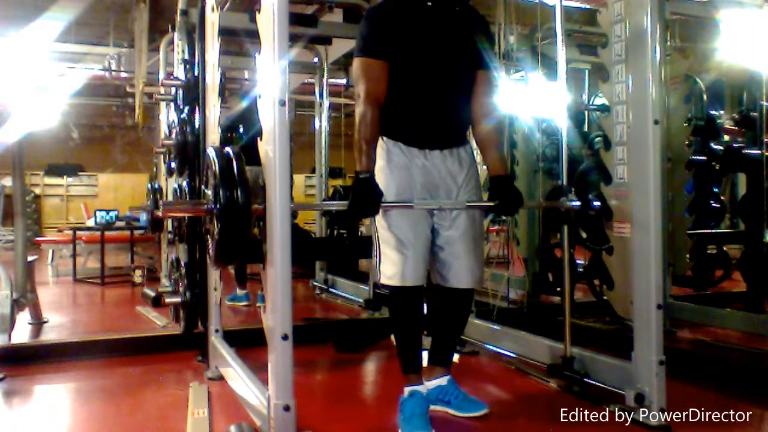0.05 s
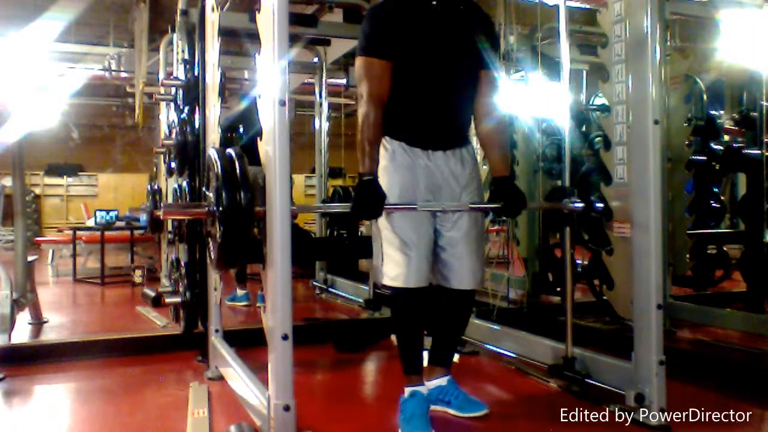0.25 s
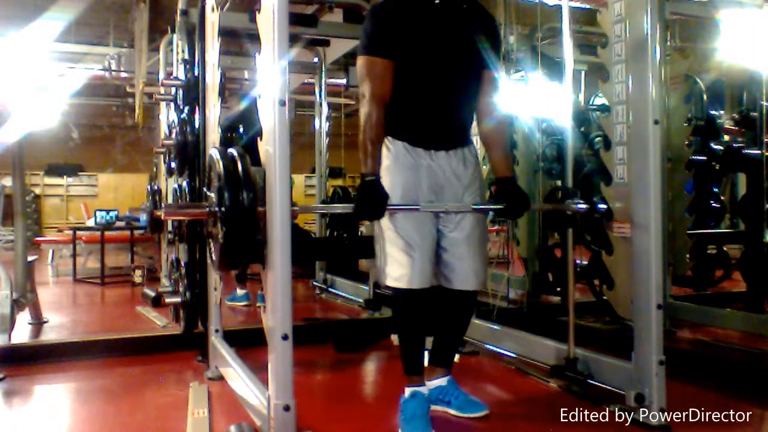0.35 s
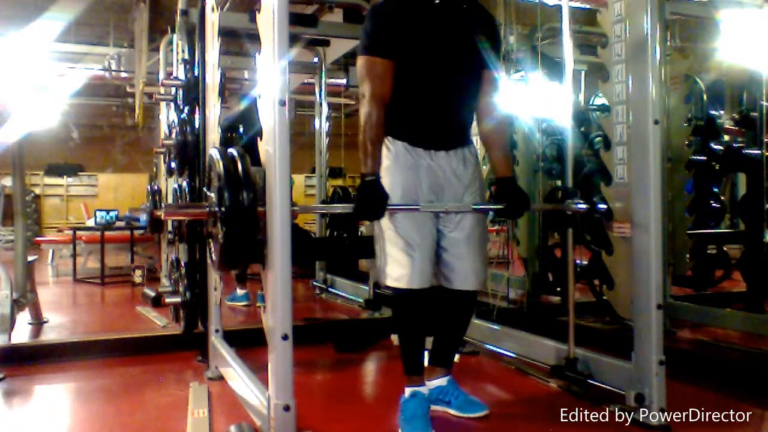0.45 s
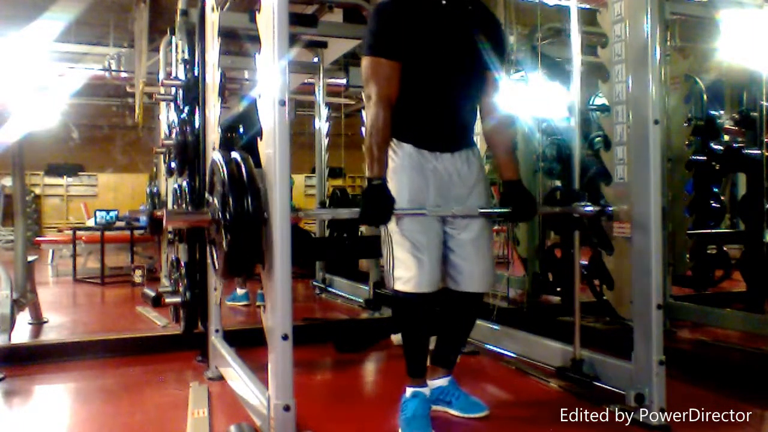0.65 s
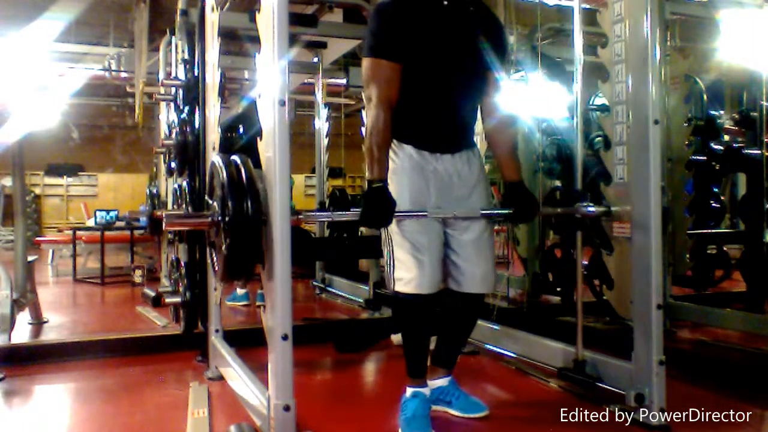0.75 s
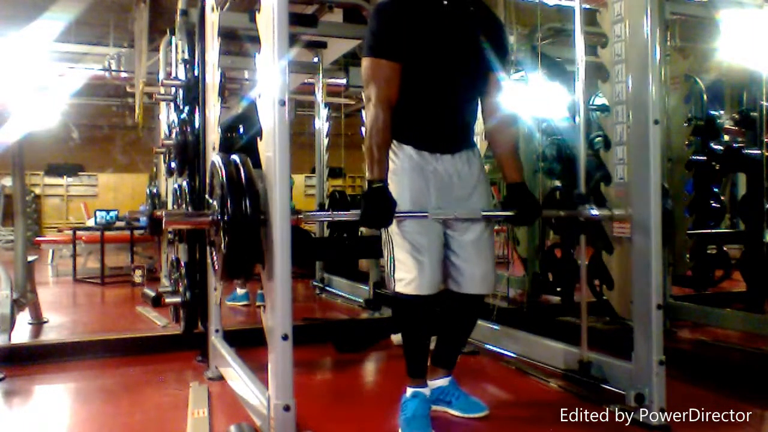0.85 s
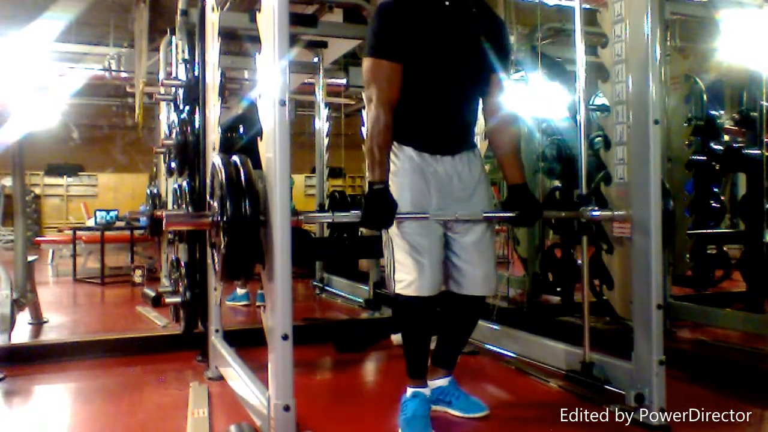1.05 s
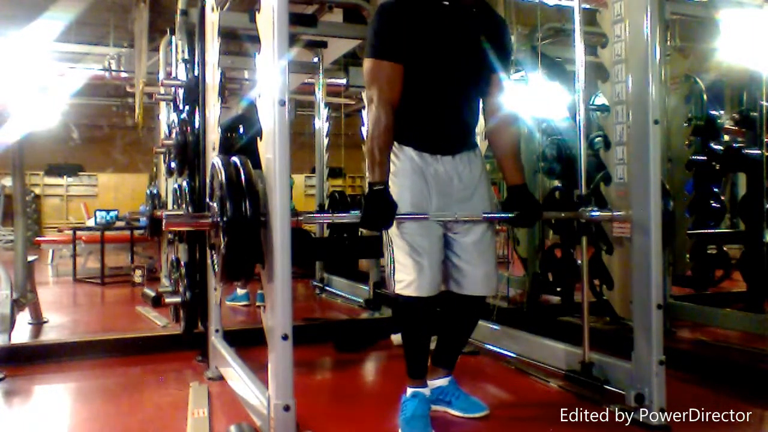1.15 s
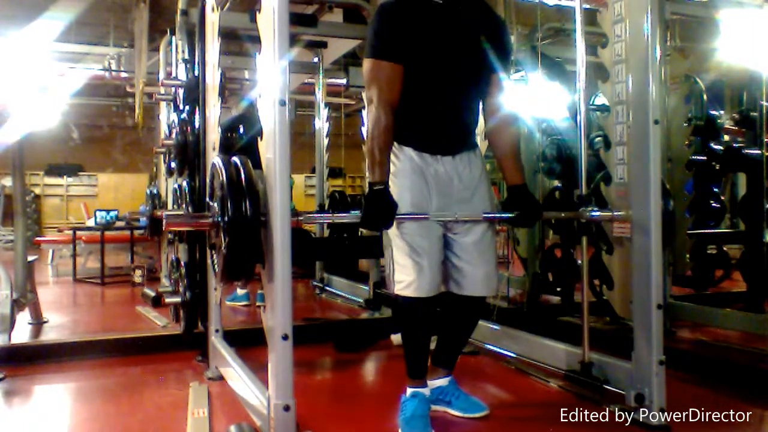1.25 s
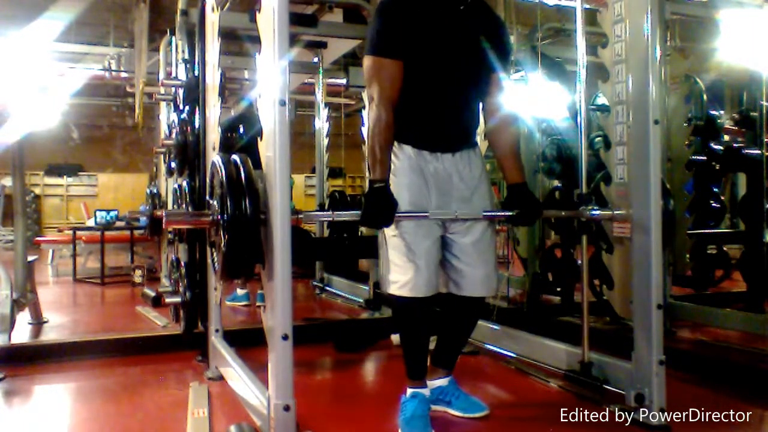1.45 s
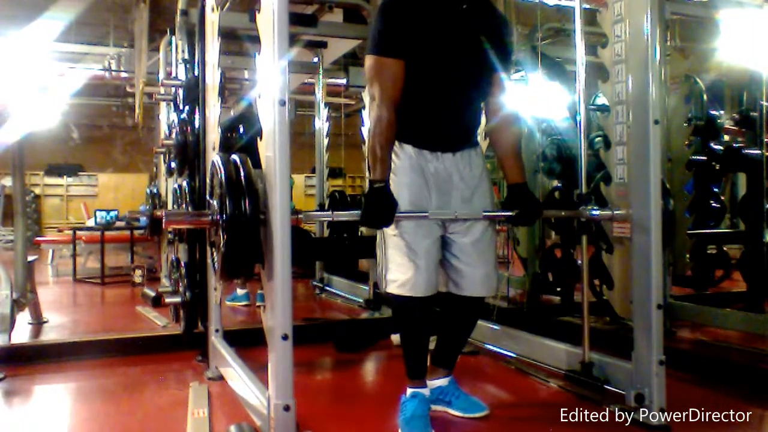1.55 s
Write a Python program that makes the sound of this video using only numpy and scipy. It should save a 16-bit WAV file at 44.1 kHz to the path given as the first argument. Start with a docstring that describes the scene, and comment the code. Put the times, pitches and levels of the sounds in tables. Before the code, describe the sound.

Barbell clanking on a steel gym rack, its iron plates ringing, followed by a lighter rattle.

```python
"""Loaded bar on a steel rack

The bar clanks twice against the rack and chatters, rests, then rattles more softly.
Each contact rings the frame, the iron plates and the gym, over a rush of ventilation.
A small recorder suppresses quiet sound, limits and clips."""
import sys
import numpy as np
from scipy import signal
from scipy.fft import rfft, irfft
from scipy.io import wavfile
from scipy.ndimage import uniform_filter1d

SR = 44100
rng = np.random.default_rng(int(sys.argv[2]) if len(sys.argv) > 2 else 0)


def transcribe(signal):
    """Save signal, clipped to [-1, 1], as a 16-bit WAV file at the path in sys.argv[1]."""
    frames = np.atleast_2d(signal).T
    limited = np.clip(frames, -1, 1)
    pcm = np.round(limited * 32767).astype(np.int16)
    wavfile.write(sys.argv[1], SR, pcm)


N = 70560

# shaken steel, spectrum: f/Hz, level/dB
STEEL_SPECTRUM = [(41, -59.5), (70, -33), (125, -12), (311, -4), (623, -10.5), (760, -2.5), (1410, -14),
                  (1550, -9.5), (4280, -15.5), (4730, -17), (6000, -18.5), (6620, -18.5), (8080, -35.5),
                  (10500, -70.5), (17800, -120)]
# shaken steel, decay: f/Hz, t60/s
STEEL_DECAY = [(100, 0.7), (300, 0.15), (800, 0.43), (2000, 0.21), (4000, 0.23), (8000, 0.39)]
THUD_TOP_HZ, CLANG_TOP_HZ, CLATTER_TOP_HZ, EDGE_HZ = 458, 1110, 3210, 8200
BRIGHT, THUD, CLANG, PLATE, CLATTER = 1, 2, 3, 4, 5  # level columns of the hits
SPOTS = 4  # struck in rotation
EARLY_SAMPLES = 900


def amp(db):
    return 10 ** (np.asarray(db) / 20)


def unit_energy(x):
    return x / np.sqrt(np.sum(x ** 2) + 1e-20)


def curve_at(points, hz):
    knots_hz, values = np.transpose(points)
    return np.interp(np.log(hz + 1), np.log(knots_hz + 1), values)


def band(x, kind, hz, order=3):
    return signal.sosfilt(signal.butter(order, hz, kind, fs=SR, output="sos"), x)


def blend(base, added, db):
    """Mix with the added signal's early level db above the base's."""
    return base + amp(db) * added * np.std(base[:EARLY_SAMPLES]) / np.std(added[:EARLY_SAMPLES])


def dying_noise(gain_db, decay):
    """1 s of coloured noise, each band with its own t60."""
    noise = irfft(rfft(rng.standard_normal(SR)) * amp(gain_db(np.fft.rfftfreq(SR, 1 / SR))))
    hz, t, spectra = signal.stft(noise, SR, nperseg=256)
    t60_s = curve_at(decay, hz)[:, None]
    return signal.istft(spectra * amp(-60 * t / t60_s), SR, nperseg=256)[1][:SR]


def modes(table, swell_s=0.004):
    """0.5 s of damped sines in random phase, padded to 1 s."""
    hz, db, t60_s = np.transpose(table)[:, :, None]
    t = np.arange(SR // 2) / SR
    sines = amp(db - 60 * t / t60_s) * np.sin(2 * np.pi * (hz * t + rng.random(hz.shape)))
    return np.r_[np.minimum(t / swell_s, 1) * sines.sum(0), np.zeros(SR - SR // 2)]


def ventilation(level_db=-40.5, patch_db=1.9):
    """Steady rush of air, slightly patchy."""
    # air spectrum: f/Hz, level/dB
    air_spectrum = [(41, -62), (70, -36), (209, -12), (245, -21), (394, -4), (491, -10.5), (1460, -23),
                    (4360, -35), (6120, -26), (8080, -36), (10500, -57.5), (17800, -120)]
    hz, _, spectra = signal.stft(rng.standard_normal(N + 1024), SR, nperseg=1024)
    patches = uniform_filter1d(rng.standard_normal(spectra.shape), 8, axis=0)
    patches = uniform_filter1d(patches, 3, axis=1)
    gain_db = curve_at(air_spectrum, hz)[:, None] + patch_db * patches / patches.std()
    rush = signal.istft(spectra * amp(gain_db), SR, nperseg=1024)[1][:N]
    return amp(level_db) * rush / rush.std()


def lone_modes():
    """Single frame and plate modes stand out as short, soft-edged tones."""
    # tones: t/s, f/Hz, level/dB, length/s
    tones = [(.158, 800, -38, .014), (.215, 300, -16, .05), (.245, 1010, -16, .09), (.53, 760, -14, .04),
             (.53, 320, -19, .08), (.80, 740, -29, .12), (.86, 235, -29, .14), (.93, 670, -32, .09),
             (.95, 5000, -48, .025), (.543, 3531, -22, .025), (.543, 4880, -22, .025),
             (.543, 4560, -25, .02), (.675, 4880, -23, .025), (.675, 6740, -22, .03),
             (.715, 4880, -27, .06), (.86, 6740, -38, .06), (.88, 4880, -46, .04), (.92, 3850, -46, .05),
             (.93, 3450, -45, .04), (.97, 975, -38, .05), (1.01, 1850, -42, .025), (1.02, 2700, -48, .05),
             (1.044, 660, -30, .036), (1.055, 935, -31, .027), (1.043, 320, -42, .03),
             (1.315, 940, -29, .03), (1.31, 330, -37, .04), (1.38, 475, -35, .03), (1.44, 2790, -36, .04),
             (1.57, 2790, -29, .022), (1.57, 2590, -31, .022), (1.53, 1000, -33, .06)]
    out = np.zeros(N)
    for start_s, hz, db, length_s in tones:
        t = np.arange(round(length_s * SR)) / SR
        envelope = amp(db) * np.sqrt(np.sin(np.pi * t / length_s))
        out[round(start_s * SR):][:len(t)] += envelope * np.sin(2 * np.pi * hz * t)
    return out


def contacts(ring, column, spot, blunt=False, scatter_s=0.0073, rise_s=0.002, push_s=0.00031):
    """Contacts at one spot drive a ring, each by a blunt push or a brief scatter of knocks."""
    # bar on rack: t/s, bright clatter/dB, thud/dB, clang/dB, plate ring/dB, low clatter/dB
    hits = [(0.2114, -35, -16.5, -11, -23, -19), (0.2164, -12, -13, 0.5, -18.5, -11),
            (0.2234, 2, -6.5, 1.5, -22.5, -7), (0.2444, -7, -26.5, -12, -7.5, -20.5),
            (0.264, -14, -24, -15, -36, -21), (0.2872, -16, -14, -14.5, -40, -25.5),
            (0.3274, -18.5, -13.5, -6.5, -31, -19.5), (0.3968, -53.5, -18, -12.5, -57.5, -26.5),
            (0.4373, -34, -21.5, -33, -43.5, -50.5), (0.4839, -36, -21.5, -14.5, -25.5, -20),
            (0.5277, -4.5, -14.5, -1, -12, -16), (0.5324, -3.5, -11, -4.5, -45, -9),
            (0.5457, 2.5, -18.5, -5.5, -5.5, -17), (0.5602, 3, -38, -16.5, -12, -19),
            (0.5791, -13, -10, -32, -22, -15), (0.6024, -19, -9.5, 0, -18, -11.5),
            (0.6373, 0, -25, -8, -32, -16.5), (0.6764, -5, -12.5, -5.5, -7.5, -13),
            (0.6974, -4.5, -16, -13, -8.5, -18), (0.7435, -4.5, -14, -18, -17.5, -25),
            (0.7894, -15.5, -38, -13.5, -43, -23), (0.8294, -37, -24, -26, -28, -24),
            (0.8724, -45, -35, -24, -38.5, -36), (0.9502, -46, -60, -39.5, -46.5, -34.5),
            (1.0231, -77, -38, -56.5, -94, -40.5), (1.257, -22.5, -58, -25.5, -35.5, -61.5),
            (1.264, -16.5, -35.5, -32.5, -42, -29), (1.283, -8, -38, -18.5, -16.5, -28.5),
            (1.3224, -25, -40, -27, -18.5, -26), (1.3224, -9, -55, -18, -21.5, -23.5),
            (1.3544, -15, -48, -27, -46, -31), (1.3774, -25, -47, -19, -24, -26.5),
            (1.4024, -46, -41, -28, -37, -25), (1.4134, -23, -50, -33, -24.5, -47),
            (1.4244, -15.5, -57, -27, -28, -26), (1.4484, -35, -44, -28.5, -27, -22.5),
            (1.4684, -37, -51, -34, -45, -29.5), (1.4884, -30, -54, -23, -61, -27),
            (1.5084, -14.5, -40, -32, -29, -26), (1.5289, -18, -60, -23, -21, -54),
            (1.5493, -38, -64, -43, -31, -28), (1.5694, -15, -66, -38, -28, -36),
            (1.5894, -12, -69, -26, -59, -25.5)]
    t = np.arange(1400) / SR
    noise = rng.standard_normal((len(hits), len(t)))
    if blunt:
        push = t * np.exp(-2 * t / push_s)
        forces = np.sign(noise[:, 9:10]) * push / push.sum()  # random polarity
    else:
        envelope = np.minimum(t / min(rise_s, scatter_s), 1) * np.exp(-t / scatter_s)
        forces = [unit_energy(knocks) for knocks in noise * envelope]
    drive = np.zeros(N + len(t))
    for hit, force in zip(hits[spot::SPOTS], forces[spot::SPOTS]):
        drive[round(hit[0] * SR):][:len(t)] += amp(hit[column]) * force
    early_rms = np.sqrt(np.mean(ring[:EARLY_SAMPLES] ** 2))
    return signal.fftconvolve(drive[:N], ring / early_rms)[:N]


def frame_ring():
    """Clear low modes of the rack."""
    # frame modes: f/Hz, level/dB, t60/s
    frame_modes = [(138, -2.5, 0.37), (234.6, -4.5, 0.92), (313.3, 6, .3), (479, -8, 0.76),
                   (594, -16, 0.17), (676, 2.5, .5), (736.7, 4, 0.19), (808, 11.5, 0.1), (864, -4, 0.1),
                   (974, -4.5, 0.13), (1048, -6, 0.9)]
    return modes(frame_modes)


def small_ring(hz, spread_db=5.0, t60_ratio=1.27):
    """Many small steel modes, outlasting the dense ringing."""
    db = curve_at(STEEL_SPECTRUM, hz) + spread_db * rng.standard_normal(len(hz))
    return modes(np.c_[hz, db, t60_ratio * curve_at(STEEL_DECAY, hz)])


def plate_ring(spread_db=3.0):
    """Iron plates; mode levels vary with the spot struck."""
    # plate modes: f/Hz, level/dB, t60/s
    plate_modes = [(1556, -6, .25), (1885, -7, .25), (2358, -9, .25), (2460, -5, .2), (2790, -8, .25),
                   (3090, -10, .25), (3531, -5, .12), (3919, -9, .2), (4188, -12, .2), (4549, -5, .12),
                   (4581, -8, .12), (4880, 0, .2), (5281, -5, .22), (5750, -11, .2), (6261, -5, .14),
                   (6430, -7, .12), (6638, -8, .14), (6740, 0, .18), (6800, -4, .18), (7327, -7, .25),
                   (7779, -14, .2)]
    return modes(plate_modes + rng.standard_normal((len(plate_modes), 1)) * [0, spread_db, 0])


def bar_on_rack():
    """Dense steel ringing, a new mix at each spot, plus clear frame and plate modes."""
    out = np.zeros(N)
    frame = frame_ring()
    small_hz = rng.uniform(CLANG_TOP_HZ, EDGE_HZ, size=160)
    for spot in range(SPOTS):
        dense = dying_noise(lambda hz: curve_at(STEEL_SPECTRUM, hz), STEEL_DECAY)
        body = blend(dense, frame, db=-8.5)
        top = blend(band(dense, "high", CLANG_TOP_HZ), small_ring(small_hz), db=-4.5)
        out += amp(-4.5) * contacts(plate_ring(), PLATE, spot, scatter_s=0.00003)  # plate on plate
        out += contacts(band(body, "low", THUD_TOP_HZ), THUD, spot, blunt=True)
        out += contacts(band(body, "band", [THUD_TOP_HZ, CLANG_TOP_HZ]), CLANG, spot, blunt=True)
        out += contacts(band(top, "low", CLATTER_TOP_HZ), CLATTER, spot)
        out += amp(-13) * contacts(band(top, "high", CLATTER_TOP_HZ), BRIGHT, spot)
    return amp(-6) * out


def gym_reverb(x, level_db=-15, delay_samples=500):
    """Diffuse tail, darkened by 1 dB per 1500 Hz."""
    # room decay: f/Hz, t60/s
    gym_decay = [(200, .8), (1000, 0.87), (7000, 0.49)]
    tail = unit_energy(dying_noise(lambda hz: -hz / 1500, gym_decay))
    return amp(level_db) * signal.fftconvolve(x, np.r_[np.zeros(delay_samples), tail])[:N]


def suppressor(x, threshold_db=-37.5, floor_db=-16, steepness=0.53):
    """Turns quiet time-frequency bins down."""
    # threshold offset: f/Hz, level/dB
    offsets = [(100, -24.5), (400, 5), (1000, -10), (2000, -15), (4000, -24.5), (8000, -7.5)]
    hz, _, spectra = signal.stft(x, SR, nperseg=512, noverlap=384)
    power = uniform_filter1d(uniform_filter1d(abs(spectra) ** 2, 5, axis=0), 5, axis=1)
    threshold = amp(threshold_db + curve_at(offsets, hz)[:, None]) ** 2
    gain = np.maximum((power / (power + threshold)) ** steepness, amp(floor_db))
    return signal.istft(spectra * gain, SR, nperseg=512, noverlap=384)[1][:N]


def limiter(x, threshold_db=-9.5, release_db_per_s=153, slope=0.43):
    """Removes part of the level above threshold; recovers at a fixed rate."""
    power_db = 10 * np.log10(abs(uniform_filter1d(x ** 2, size=300)) + 1e-12)
    release_db = np.arange(N) * release_db_per_s / SR
    held_db = np.maximum.accumulate(power_db + release_db) - release_db
    over_db = np.maximum(held_db - threshold_db, 0)
    return x / amp(slope * uniform_filter1d(over_db, size=100))


def scene():
    clanks = bar_on_rack()
    return np.array([clanks + gym_reverb(clanks) + lone_modes() + ventilation()])


def record(dry):
    """Bass cut, suppressor, limiter, clipping, band limit."""
    x = band(dry[0], "high", hz=103.5, order=10)
    clipped = np.clip(limiter(suppressor(x)), -1, 1)
    lowpass = signal.firwin(511, EDGE_HZ, window=("kaiser", 9), fs=SR)
    return signal.oaconvolve(clipped, lowpass, "same")[None]


dry = scene()
out = record(dry)
transcribe(out)
```